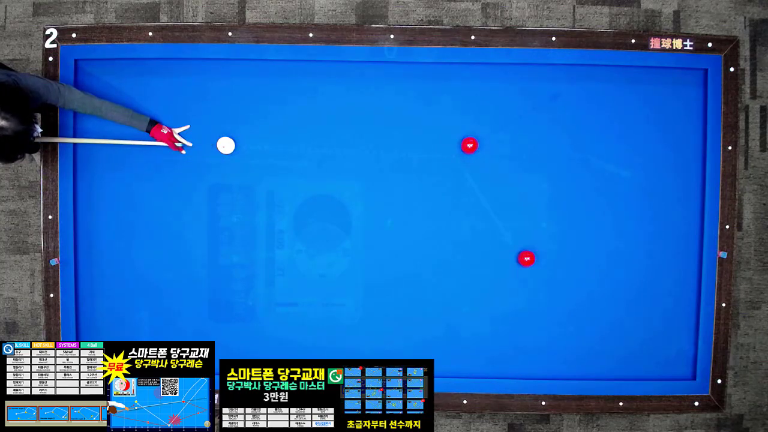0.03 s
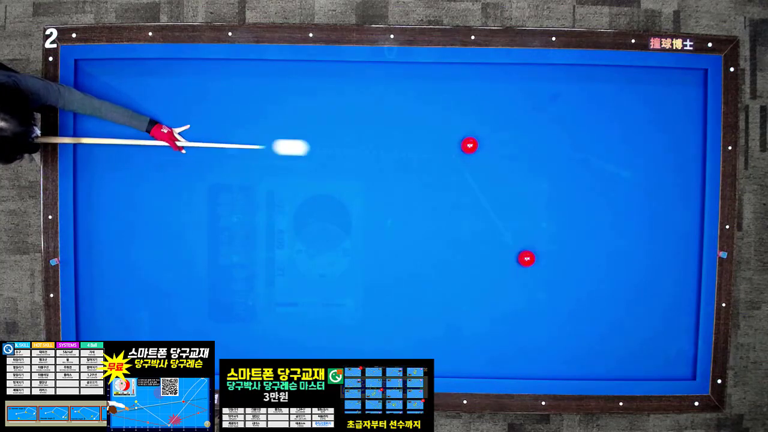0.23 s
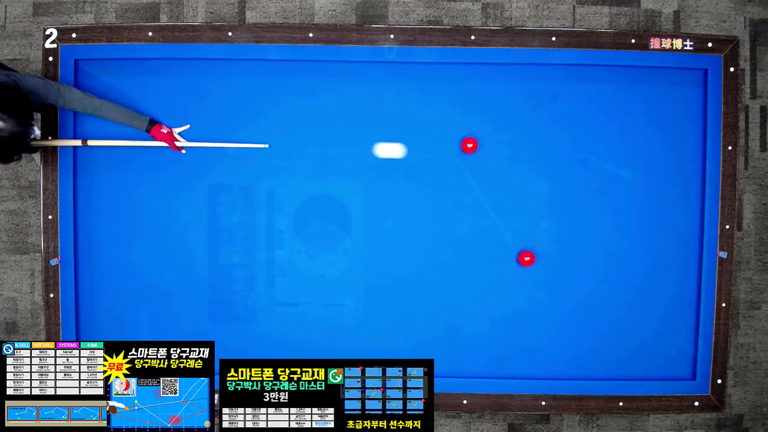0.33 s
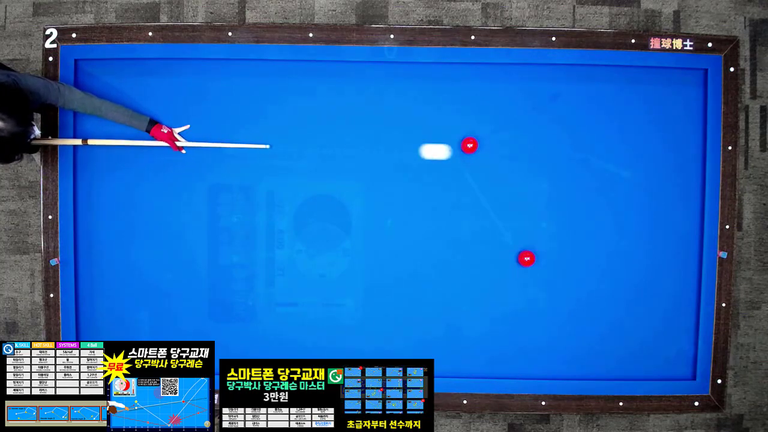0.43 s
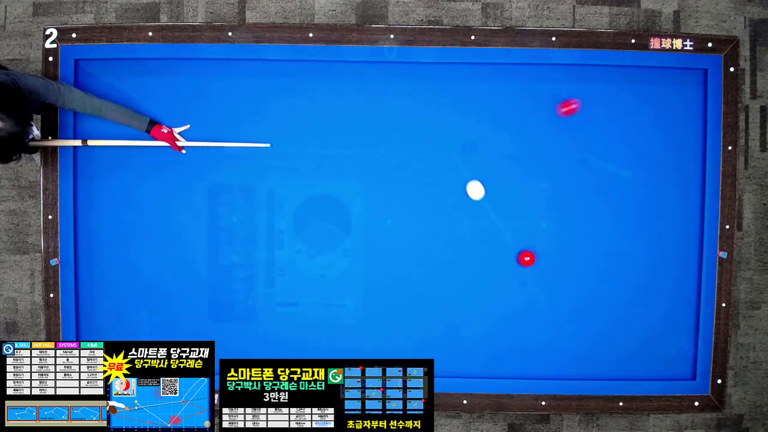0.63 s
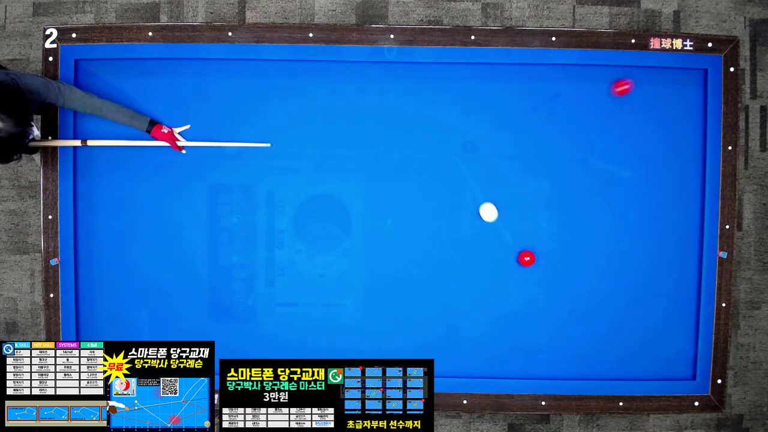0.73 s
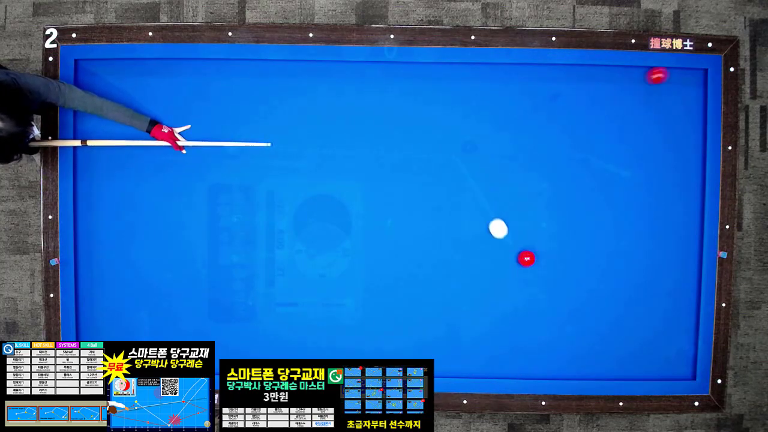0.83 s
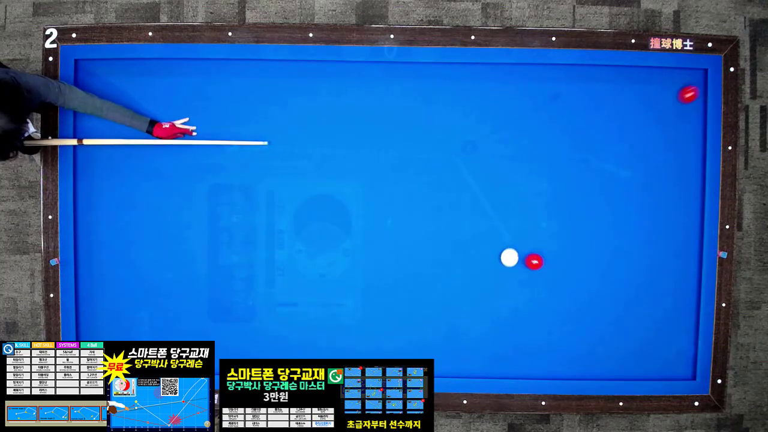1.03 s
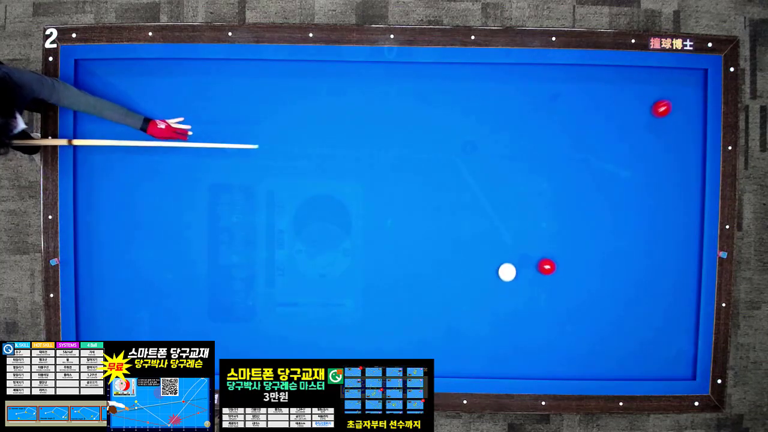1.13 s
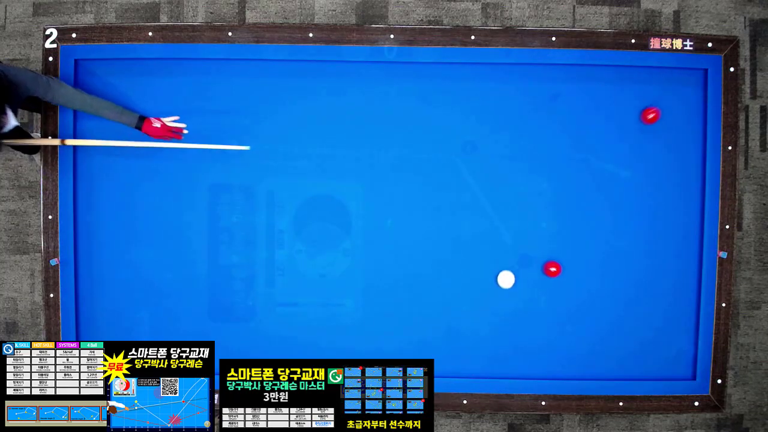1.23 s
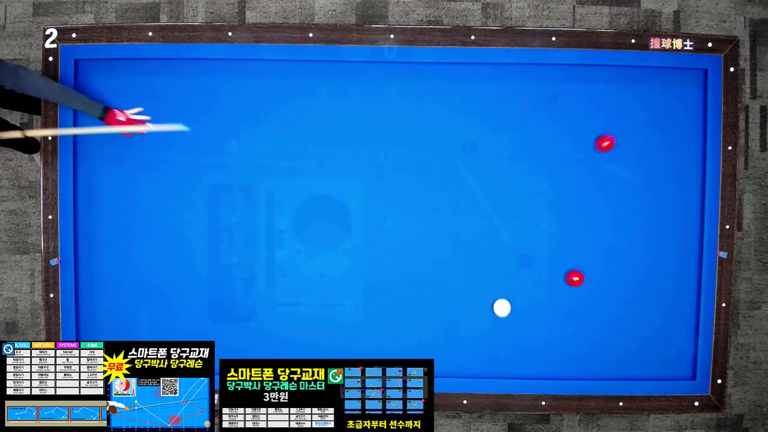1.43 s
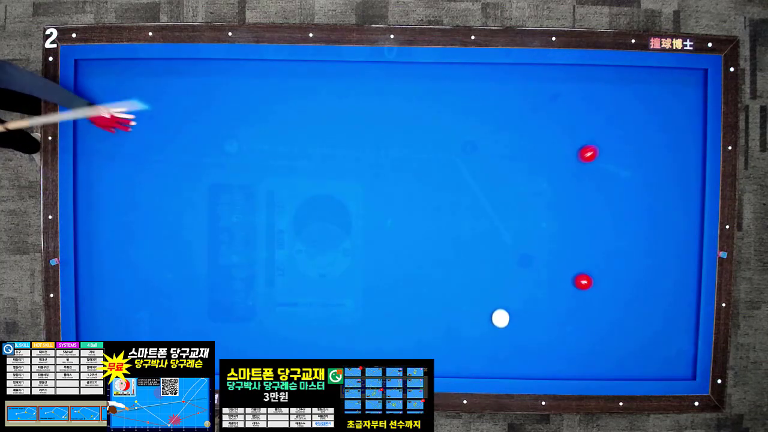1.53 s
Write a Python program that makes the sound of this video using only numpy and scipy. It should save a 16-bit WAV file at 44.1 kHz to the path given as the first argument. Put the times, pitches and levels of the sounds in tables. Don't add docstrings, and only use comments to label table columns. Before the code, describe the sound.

A sharp billiard ball clack rings through a hard-walled hall after a cue tip thud, then a fainter click

```python
import sys
import numpy as np
from scipy import signal
from scipy.fft import rfft, irfft
from scipy.io import wavfile
from scipy.ndimage import uniform_filter1d

SR = 44100
rng = np.random.default_rng(int(sys.argv[2]) if len(sys.argv) > 2 else 0)


def invert_db(level):
    return 10 ** (np.asarray(level, dtype=float) / 20)


def generate_wav(sig):
    pcm = np.round(np.clip(np.atleast_2d(sig).T, -1, 1) * 32767).astype(np.int16)
    wavfile.write(sys.argv[1], SR, pcm)


N = 70560
T = np.arange(N) / SR
F = np.arange(N + 1) * SR / (2 * N)
HALL_RISE_MS = 1.3


def set_rms(x, db):
    return x * invert_db(db) / np.sqrt(np.mean(x ** 2))


def set_peak(x, db):
    return x * invert_db(db) / abs(x).max()


def read(table, hz):
    table_hz, value = np.array(table).T
    return np.interp(np.log(hz + 1), np.log(table_hz), value)


def band(x, hz, width_hz):
    return signal.lfilter(*signal.iirpeak(hz, hz / width_hz, fs=SR), x)


def hump(hz, width_hz):
    return 1 / (1 + ((F - hz) / width_hz) ** 2)


def butter(x, order, hz, kind):
    return signal.sosfilt(signal.butter(order, hz, kind, fs=SR, output="sos"), x)


def diffuse(gain):
    ports_m, spread_floor = 0.076, 0.0071
    alike = (1 - spread_floor) * np.sinc(2 * F * ports_m / 343)
    noise = rfft(rng.standard_normal((2, 2 * N)))
    mid, side = noise * gain * np.sqrt([1 + alike, 1 - alike])
    return irfft(np.array([mid + side, mid - side]))[:, :N]


def walk(rate):
    k = int(SR / rate)
    steps = np.repeat(rng.standard_normal(N // k + 1), k)
    return 1.1 * uniform_filter1d(uniform_filter1d(steps, k), k)[:N]


def arrive(x, start_s, paths):
    side = np.array([[1], [-1]])
    way = 0
    for ms, db, lag_ms, pan_db in paths:
        delay_s = start_s + (ms + side * lag_ms / 2) / 1000
        way = way + invert_db(db + side * pan_db / 2) * np.exp(-2j * np.pi * F * delay_s)
    return irfft(rfft(x, 2 * N) * way)[:, :N]


def tail(x, start_s, rise_ms):
    # (frequency [Hz], t60 [s])
    hall_decay = [(150, .7), (400, 0.5), (1000, 0.4), (2300, 0.57), (4300, 0.37), (7000, 0.35),
                  (12000, 0.12)]
    hall = 0
    for hz in 100 * 2 ** np.arange(0, 7.5, .5):
        half_octave = np.clip(1 - 2 * abs(np.log2((F + 1) / hz)), 0, 1) ** .5
        hall = hall + diffuse(half_octave) * invert_db(-60 * T / read(hall_decay, hz))
    hall = hall * (1 - np.exp(-T * 1000 / rise_ms)) / 10
    delay = np.exp(-2j * np.pi * F * start_s)
    return irfft(rfft(hall, 2 * N) * rfft(x, 2 * N) * delay)[:, :N]


def push(contact_ms, power):
    force = np.sin(np.pi * np.clip(T * 1000 / contact_ms, 0, 1)) ** power
    return np.diff(force, prepend=0) / np.diff(force).max()


def ventilation():
    # (frequency [Hz], level [dB per Hz])
    air_spectrum = [(15, -39), (25, -0.5), (99, -13), (150, -5.5), (194, -12.5), (233, -5), (275, -13),
                    (469, -11.5), (6500, -47.5), (8450, -74), (14300, -120)]
    air = set_rms(diffuse(invert_db(read(air_spectrum, F))), -57) * invert_db(0.4 * walk(22))
    hum = set_rms(diffuse(hump(148.3, 9)), -64.5)
    return air + hum


def electronics():
    # (frequency [Hz], level [dB per Hz])
    hiss_spectrum = [(2650, -32.5), (4500, -29), (7360, -18.5), (7640, -10), (9010, -19), (9350, -13.5),
                     (13800, -40.5)]
    # (frequency [Hz], left level [dB], left-right difference [dB])
    whine_tones = [(7930, -85, 8), (6650, -112, -20), (9911, -97, 8)]
    first_s, every_s, pip_ms, pip_hz = .0088, .03027, 6.1, 8835
    since = (T - first_s) % every_s * 1000 / pip_ms
    shape = np.clip(1.7 * np.sin(np.pi * np.minimum(since, 1)), 0, 1)
    pips = invert_db(-67) * shape * np.sin(2 * np.pi * pip_hz * T)
    whine = 0
    for hz, db, pan_db in whine_tones:
        ports_db = db + 1.5 * walk(34) - np.array([[0], [pan_db]])
        whine = whine + invert_db(ports_db) * np.sin(2 * np.pi * hz * T)
    hiss = set_rms(diffuse(invert_db(read(hiss_spectrum, F))), -80)
    return hiss + pips * invert_db(np.array([[0], [-8]])) + whine


def thuds():
    thud_times = [
        .2371,
        1.0615,
    ]
    # (level [dB], contact [ms], tail [dB], tail rise [ms])
    blows = [
        (-12.5, 1.27, -7, 61),
        (-26, 1.15, -14, 2.6),
    ]
    # (delay [ms], level [dB], left lag [ms], left-right difference [dB])
    thud_echoes = [
        [(3.87, -19, -.1, 12), (16.85, -6.5, -0.16, -1), (25.74, -18.5, 0.027, 4), (45.1, -38, .01, 10),
         (67.1, -49, .02, -2), (82.05, -18.5, .01, -2)],
        [(9.07, -1, .02, 0.3), (25.55, -4.5, 0.2, -1)],
    ]
    out = 0
    for s, (db, ms, tail_db, rise_ms), echoes in zip(thud_times, blows, thud_echoes):
        swing = band(band(push(ms, 2.46), 369, 420), 369, 1200)
        blow = -set_peak(swing, db)
        blow = blow + set_peak(band(blow, 110, 100), db - 8)
        direct = (0.077, 0.013, -0.023, .1)
        out = out + arrive(blow, s, [direct] + echoes)
        out = out + invert_db(tail_db) * tail(blow, s, rise_ms)
    return out


def cue():
    # (frequency [Hz], level [dB], t60 [s])
    cue_modes = [(2000, -10.5, 0.055), (2350, -5, .05), (3570, -7, .04), (5740, 10, 0.0066),
                 (5420, -4.5, 0.1), (7060, -12, 0.036), (8500, -11.5, 0.021)]
    # (frequency [Hz], level [dB per Hz])
    rattle_spectrum = [(410, -33), (700, -22), (1050, -20.5), (1710, -23.5), (2330, -21.5), (3020, -26.5),
                       (5600, -38.5), (11200, -45), (13500, -84)]
    start_s, rattle_ms = .2383, 8
    ring = 0
    for hz, db, t60 in cue_modes:
        ring = ring + invert_db(-21.5 + db - 60 * T / t60) * np.sin(2 * np.pi * hz * T)
    ring = ring * (1 - np.exp(-T / 0.00029))
    rattle = set_rms(diffuse(invert_db(read(rattle_spectrum, F))), -26.5)
    rattle = rattle * np.exp(-T * 1000 / rattle_ms) * (1 - np.exp(-T / 0.00067))
    late = tail(invert_db(-20.5) * ring + rattle[0], start_s, HALL_RISE_MS)
    direct = arrive(ring, start_s, [(0.042, 0, -.1, 3)])
    return direct + np.roll(rattle, int(start_s * SR), axis=1) + invert_db(-17) * late


def rolling():
    from_s, fade_s = .245, 0.32
    rumble = set_rms(diffuse(hump(330, 220)), -45.5) * invert_db(2 * walk(7))
    return rumble * (T > from_s) * np.exp(-(T - from_s) / fade_s)


def clacks():
    clack_times = [
        .5199,
        1.0501,
    ]
    contacts = [
        .365,
        .48,
    ]
    # (level [dB], tail [dB], treble [dB], slate boom [dB])
    clack_levels = [
        (-4.5, -9.5, 11.5, -19),
        (-22.5, -8.5, 3.5, -19.5),
    ]
    echo_levels = [
        -7,
        -20,
    ]
    # (delay [ms], level [dB], left lag [ms], left-right difference [dB])
    wall_echoes = [
        [(3.6, -7, -.1, 5.7), (10.1, -8, 0, -.8), (15.1, 4.5, .2, -.6), (18.4, -10, -.2, 7.5),
         (23.1, -5, .2, .2), (30, -9, .28, 9), (36, -12, -.16, -8), (52.4, -13, -.25, 1.9),
         (61.2, -15, -.1, 1.3)],
        [(2.3, -8, .11, 1.3), (5.1, -6, .27, -.8), (9.7, -3, -.27, -3.9), (12.4, -4, -.22, 4),
         (14.3, 5, .2, .8), (20.3, -5, -.14, 9), (30, -7, .05, 5)],
    ]
    # (delay [ms], level [dB], left lag [ms], left-right difference [dB])
    near_paths = [
        (0, -7.5, 0.013, -2.3),
        (.42, 3, 0.052, -1.5),
        (0.949, -12, 0.068, 6.6),
    ]
    # (delay [ms], level [dB], left lag [ms], left-right difference [dB])
    treble_paths = [(0, -11.5, -0.14, 12), (.5, -5.5, -0.05, -7), (1.6, -8, 0.04, 0.5),
                    (3.8, -9, -0.12, 1.5), (10.1, -14.5, 0, 1.5)]
    out = 0
    for s, ms, (db, tail_db, treble_db, boom_db), echo_db, echoes in zip(
            clack_times, contacts, clack_levels, echo_levels, wall_echoes):
        jolt = push(ms, 1.834)
        body = set_peak(band(jolt, 2407, 3200), db)
        near = butter(band(body, 2400, 4000), 6, 1558, "high")
        treble = band(band(jolt, 10200, 4200), 10000, 4300)
        treble = invert_db(db + treble_db) * band(treble, 10800, 7880)
        dull = set_peak(butter(body, 3, (1800, 3000), "band"), echo_db)
        boom = set_peak(band(jolt, 920, 350), db + boom_db)
        out = out + arrive(near, s, near_paths) + arrive(treble, s, treble_paths) + arrive(dull, s, echoes)
        top_hz = 4200 / ms * contacts[0]
        late = butter(band(body, 2000, 1500) + invert_db(-13.5) * body, 2, top_hz, "low")
        late = late + invert_db(-17) * treble + boom
        out = out + invert_db(tail_db) * tail(late, s, HALL_RISE_MS)
    return out


def glove_slide():
    # (frequency [Hz], level [dB per Hz])
    glove_spectrum = [(1760, -26.5), (3000, 2.5), (3280, -2), (6330, -15.5), (8660, -3), (12000, -7),
                      (13800, -26.5)]
    # (time [s], level [dB])
    slide_levels = [
        (1.1, -100),
        (1.25, -79.5),
        (1.42, -74),
        (1.6, -77.5),
    ]
    slide_db = np.interp(T, *np.array(slide_levels).T) + 1.5 * walk(15)
    slide = set_rms(diffuse(invert_db(read(glove_spectrum, F))), 0) * invert_db(slide_db)
    return slide + 0.5 * slide[::-1]


def frame_hum():
    centre_s, spread_ms = 1.175, 45
    hum = set_rms(diffuse(hump(228, 35)), -53)
    return hum * np.exp(-((T - centre_s) * 1000 / spread_ms) ** 2)


def scene():
    strokes = thuds() + cue() + rolling() + clacks()
    return ventilation() + electronics() + strokes + glove_slide() + frame_hum()


def roll_off(x):
    return signal.sosfilt(signal.butter(12, 14090, fs=SR, output="sos"), x)


def record(dry):
    top_cut = signal.ellip(8, .2, 70, 13900, fs=SR, output="sos")
    mix = signal.sosfilt(top_cut, dry)
    return roll_off(mix)


dry = scene()
out = record(dry)
generate_wav(out)
```